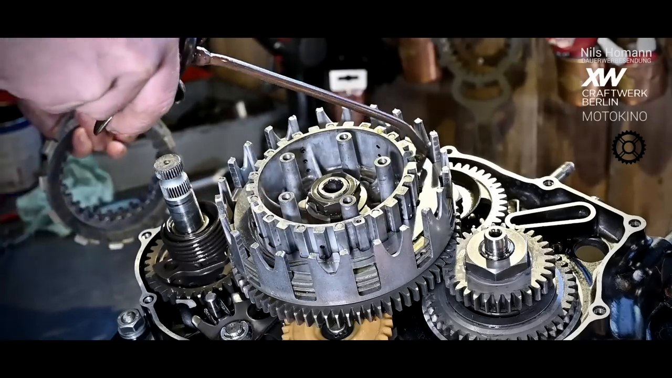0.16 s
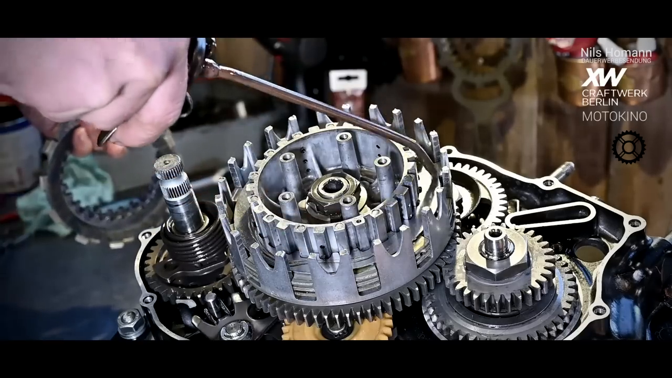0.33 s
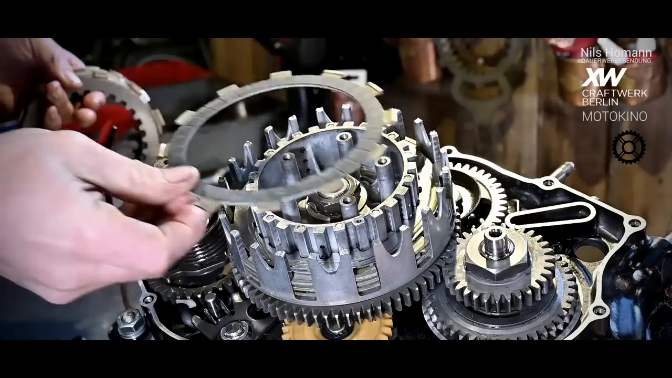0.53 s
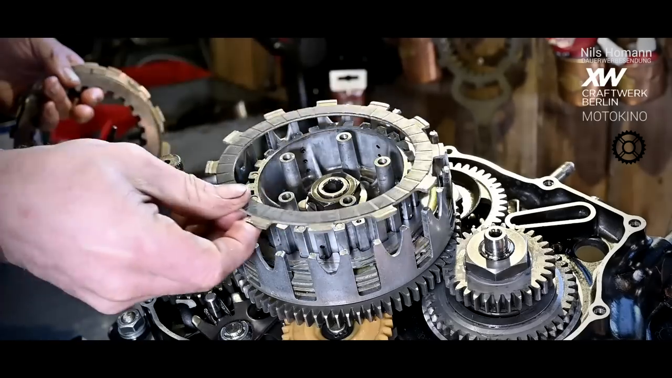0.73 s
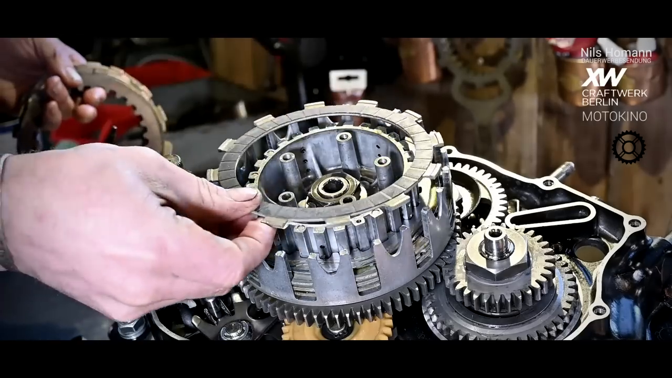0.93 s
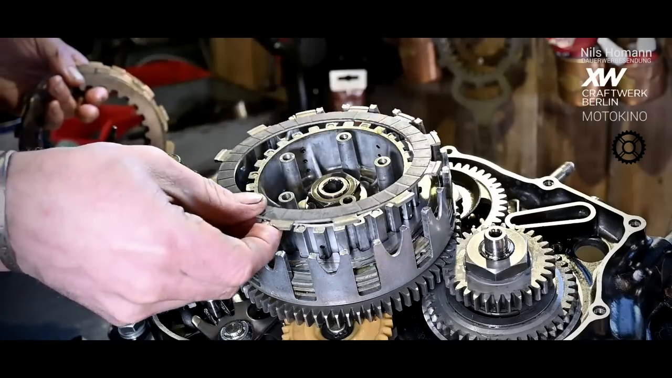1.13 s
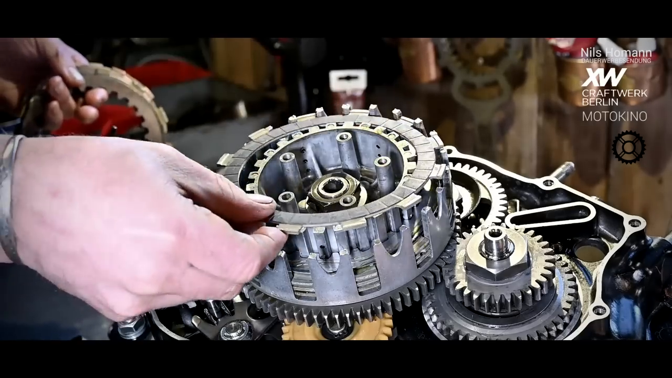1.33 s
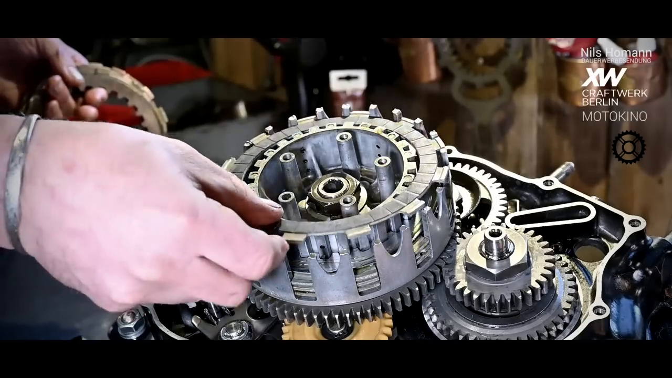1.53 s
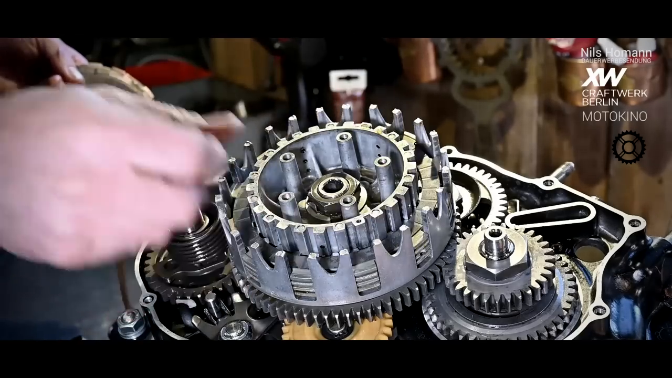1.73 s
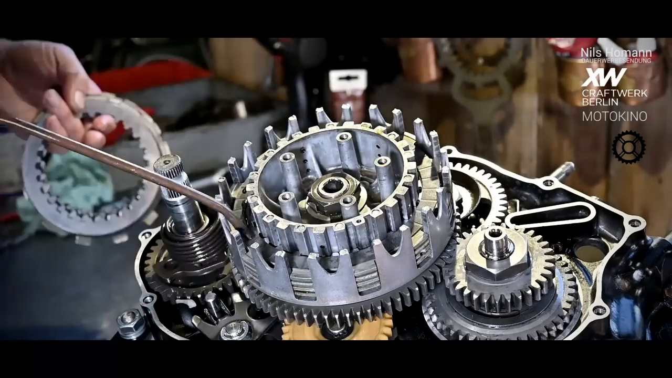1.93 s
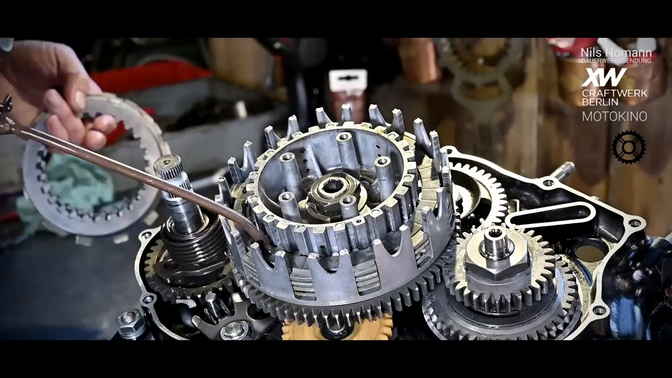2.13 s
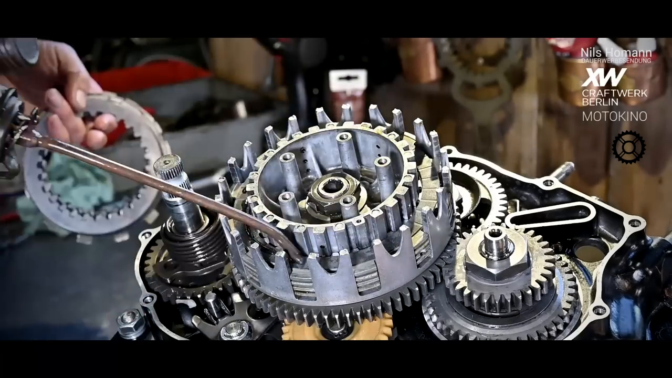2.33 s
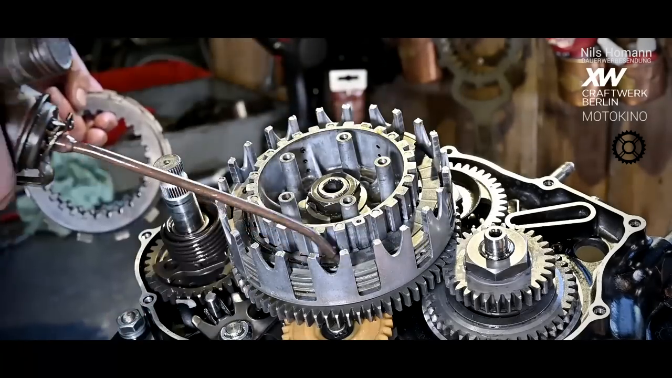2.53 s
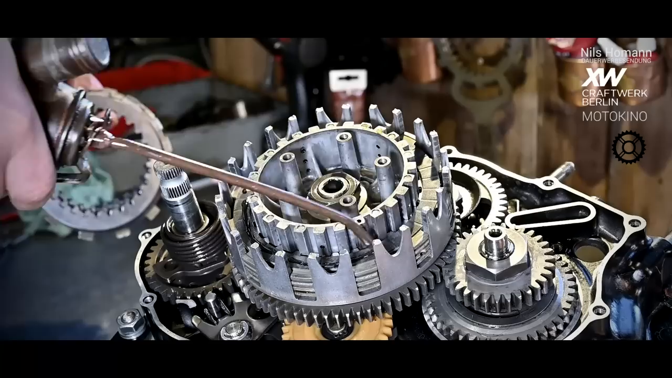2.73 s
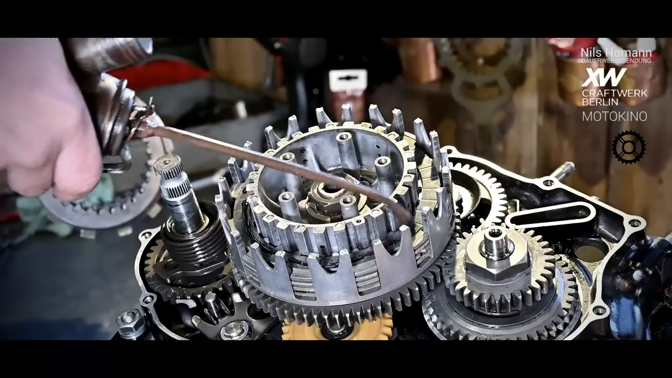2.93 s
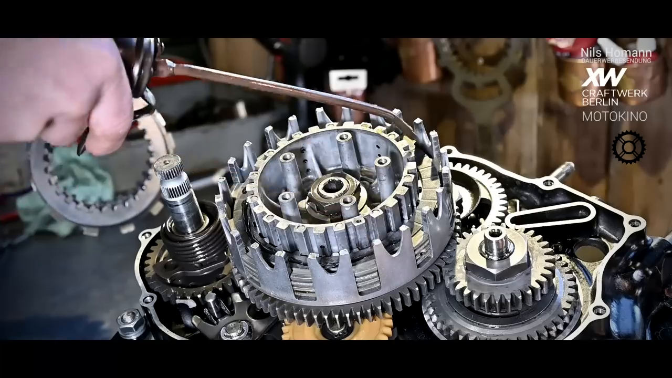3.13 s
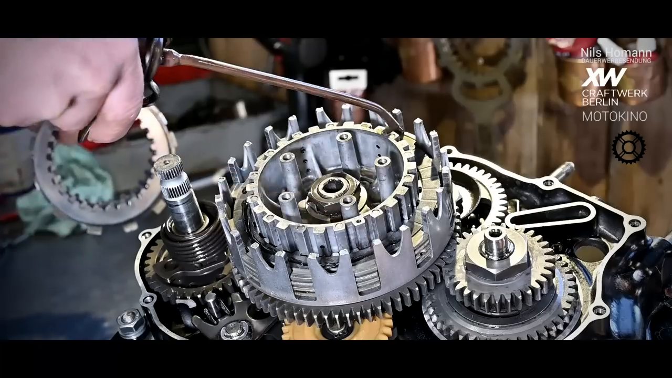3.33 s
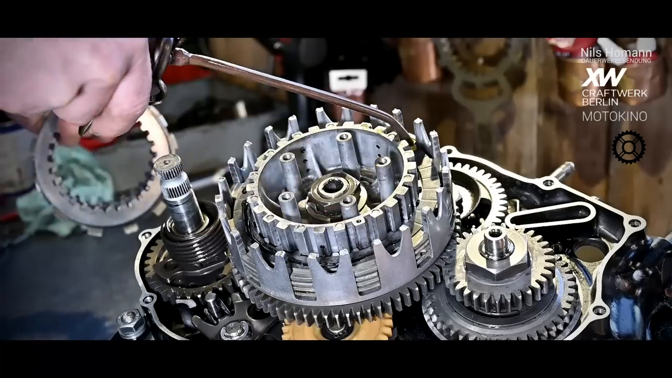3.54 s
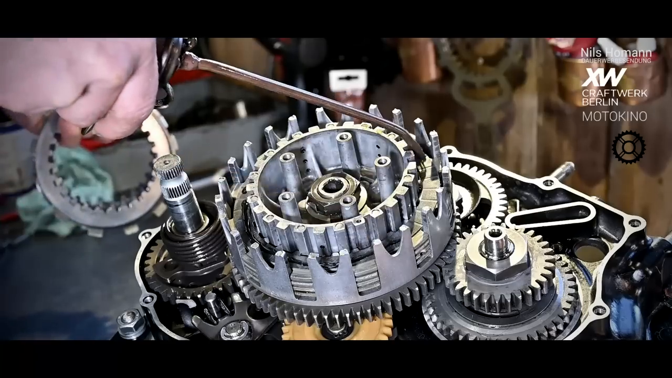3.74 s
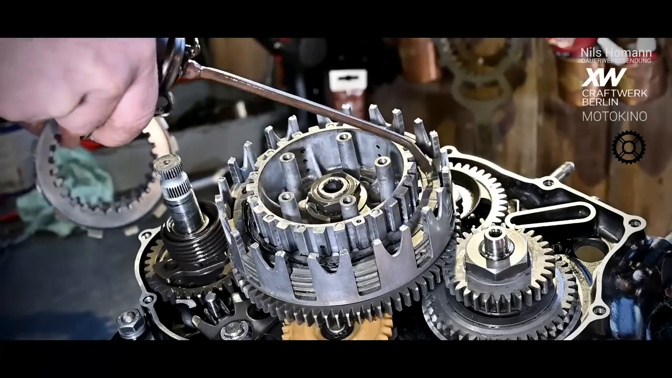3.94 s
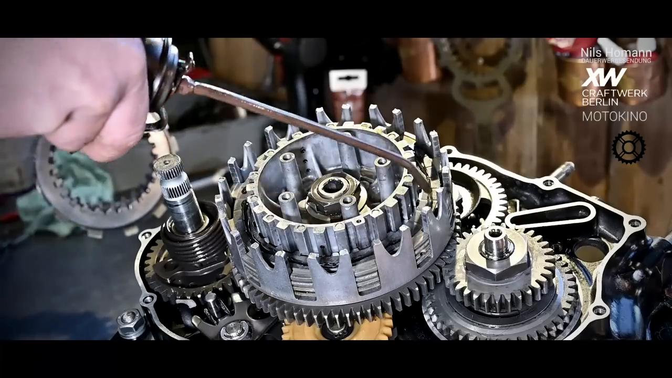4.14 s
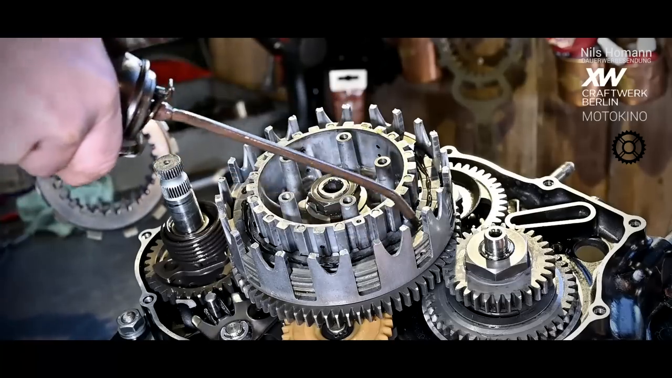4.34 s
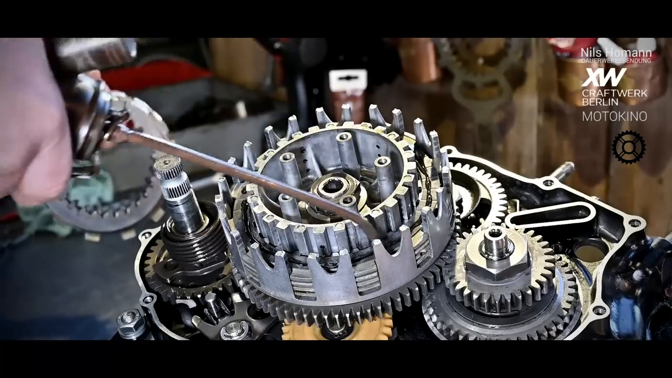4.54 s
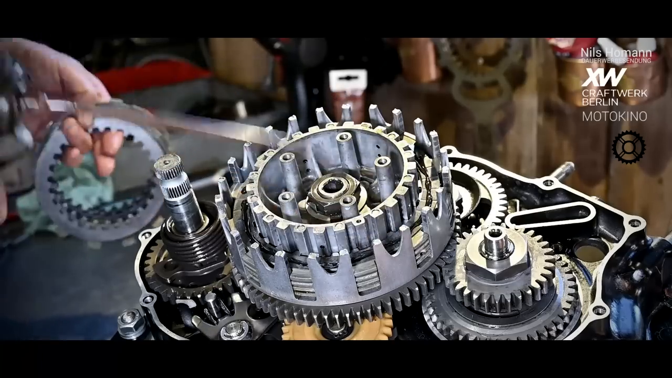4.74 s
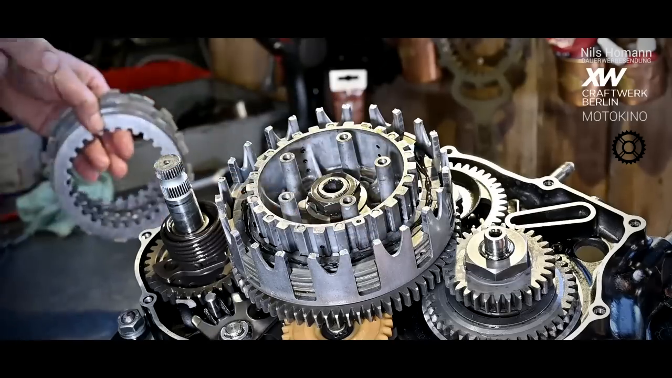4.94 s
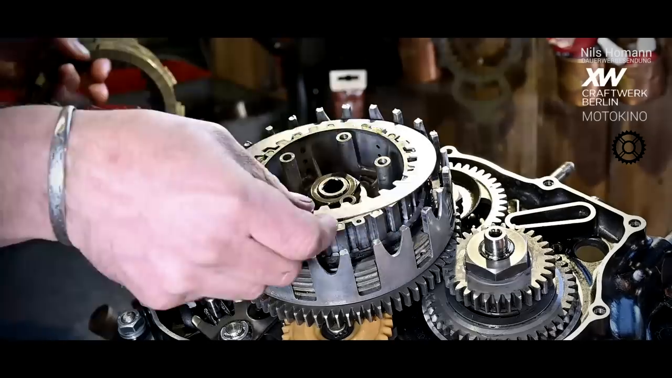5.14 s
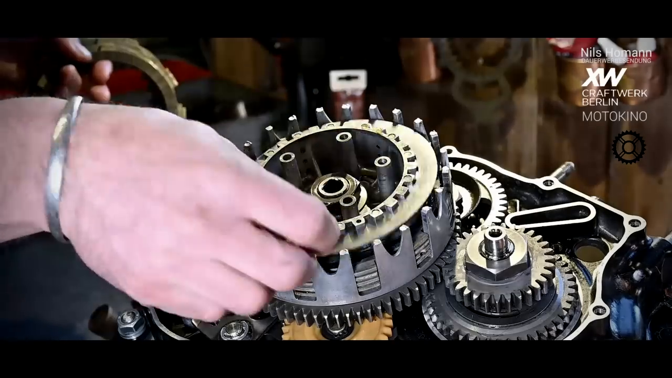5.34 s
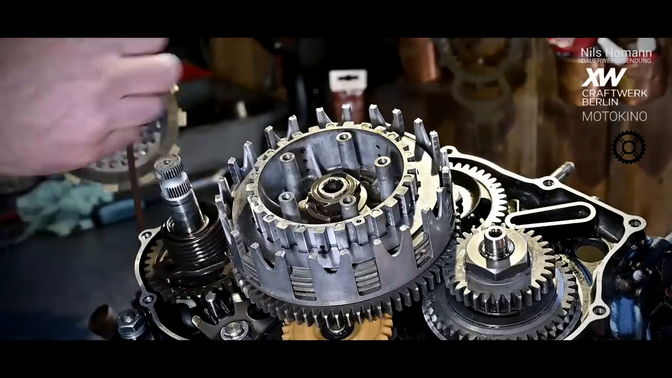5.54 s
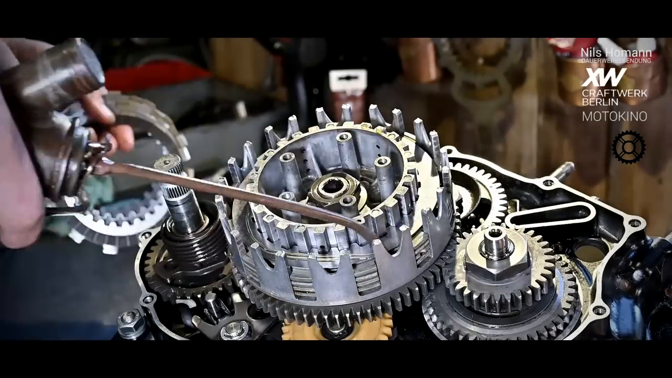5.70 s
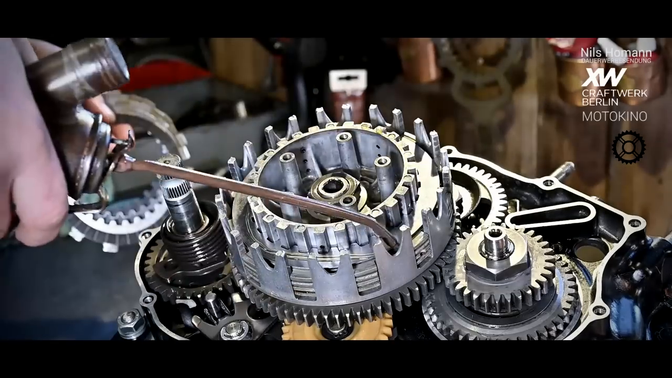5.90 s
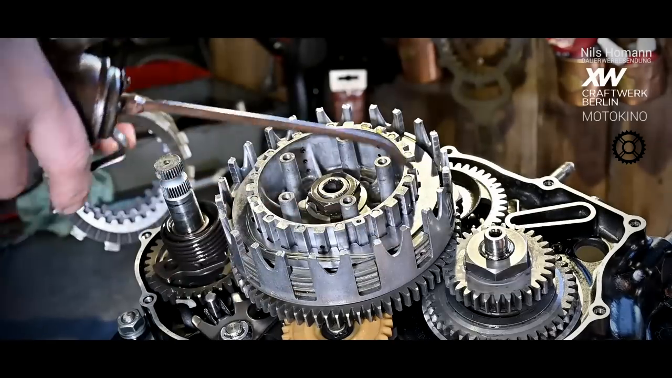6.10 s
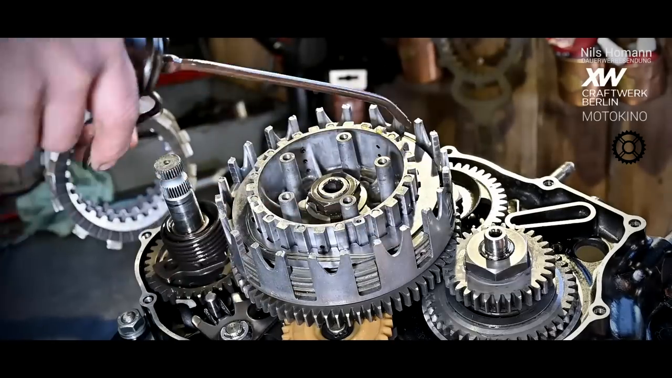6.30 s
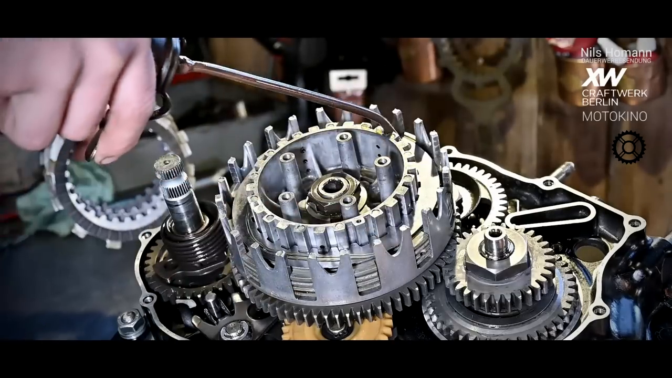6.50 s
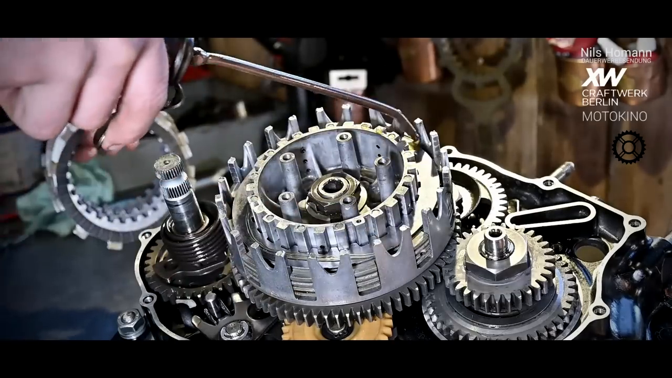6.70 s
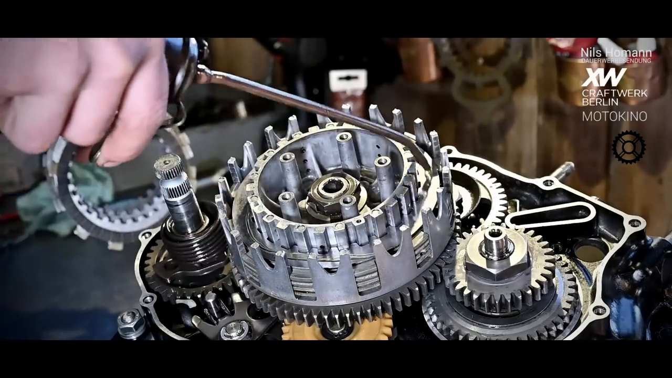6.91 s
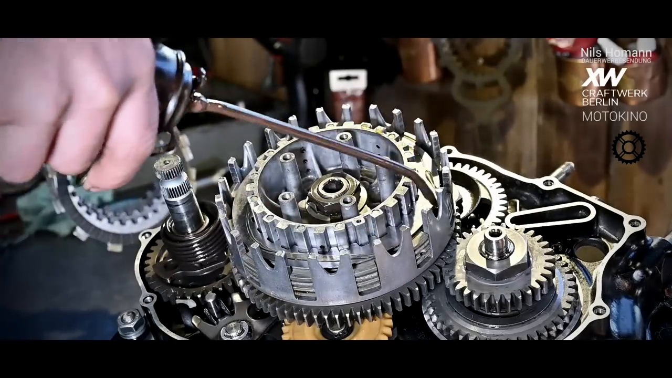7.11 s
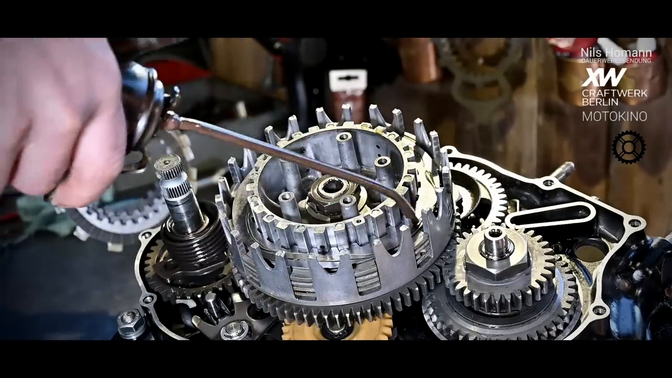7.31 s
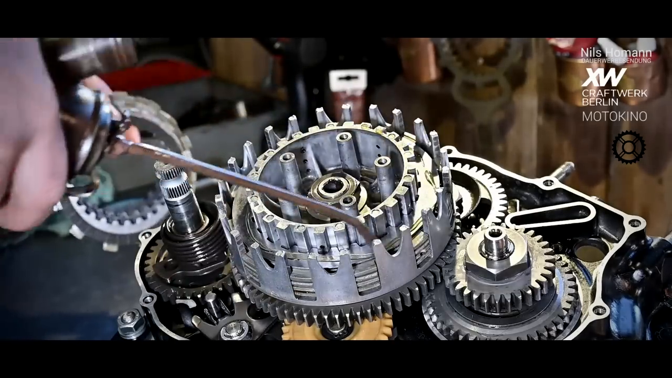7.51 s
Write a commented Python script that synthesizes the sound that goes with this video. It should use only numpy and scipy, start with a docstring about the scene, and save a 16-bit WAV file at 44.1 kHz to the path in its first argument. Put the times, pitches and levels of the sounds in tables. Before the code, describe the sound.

Close stereo sound of clutch assembly on a bench: small oiler clicks, dry plate knocks and a scrape, then a burst of hard lever clacks. Scattered clicks and faint squeaky lever slides continue. Soft steel ticks and pings lead to a quick, bright rattling ring as a steel plate settles. More oiling clicks and spout taps end quietly, with light rustling and low hiss in a short workshop reverberation.

```python
"""A small dry workshop, two spaced microphones: clutch plates are laid into their basket on a bench
and oiled between layers with a pump can. Blows are struck damped modes plus a noise snap: lever clicks,
spout taps, a lined plate knocking on the teeth, steel ticks. Noise rubbed through modes gives scrapes, rasp
and rustling hands; wavering lines ring a chattering steel plate. Pings, thumps and faint hums are single
tones; echoes, a noise-tap tail and steady hiss lie behind."""
import sys
import numpy as np
from scipy import signal
from scipy.fft import rfft, irfft
from scipy.io import wavfile
from scipy.ndimage import uniform_filter1d

SR = 44100
rng = np.random.default_rng(int(sys.argv[2]) if len(sys.argv) > 2 else 0)


def natural_amplitude(level_db):
    """Convert a level in decibels to a linear amplitude factor, elementwise."""
    exponent = np.asarray(level_db, float) / 20
    return 10 ** exponent


def generate_wav(signal):
    """Clip the signal to [-1, 1] and save it as 16-bit WAV at the path in sys.argv[1]."""
    frames = np.transpose(np.atleast_2d(signal))
    scaled = np.clip(frames, -1, 1) * 32767
    pcm = np.round(scaled).astype(np.int16)
    wavfile.write(sys.argv[1], SR, pcm)


N = 337806  # samples

# modes of the lined plate laid on the teeth: (frequency [Hz], width [Hz], level [dB])
LINED_MODES = [(1200, 490, -2.5), (2240, 530, 10.5), (3060, 300, 8.5), (4430, 330, -0.5), (5320, 250, 0.5),
               (6680, 360, 3), (7420, 270, 6.5), (10100, 210, -4), (13000, 400, 6), (14600, 1500, 14)]
# chatter of the free steel plate, duller at its end: (time [s], level [dB], brightness [dB])
STEEL_CHATTER = [(5.375, -62, -3), (5.392, -44, -5), (5.411, -36, 8), (5.415, -28, -6), (5.432, -24, -6),
                 (5.447, -31, 4.5), (5.456, -43, 7), (5.486, -38.5, -10), (5.524, -56, -10),
                 (5.572, -73, -10)]


def evened(x):
    """Scales to rms 1."""
    return x / np.sqrt(np.mean(x ** 2) + 1e-20)


def read(points, hz):
    """Reads a table on a log-frequency axis."""
    f, value = np.transpose(points)
    return np.interp(np.log(hz + 1), np.log(f + 1), value)


def add(mix, start_s, sound):
    """Mixes a two-channel sound in at start_s."""
    part = mix[:, round(start_s * SR):][:, :sound.shape[1]]
    part += sound[:, :part.shape[1]]


def slant(hz, centre_hz, thud_db, crack_db):
    """Gain in dB: 0 at the centre, thud_db at 700 Hz, crack_db at 10 kHz, up to 1.5 times those beyond."""
    below = np.clip(np.log(centre_hz / hz) / np.log(centre_hz / 700), 0, 1.5)
    above = np.clip(np.log(hz / centre_hz) / np.log(10000 / centre_hz), 0, 1.5)
    return below * thud_db + above * crack_db


def unroll(rows):
    """Start time and the columns of a curve, sample by sample."""
    s, *columns = np.transpose(rows)
    t = np.arange(s[0], s[-1], 1 / SR)
    return s[0], [np.interp(t, s, c) for c in columns]


def swells(table):
    """Level curve of each slide: swells to its level at 0.3 of its length, then fades."""
    return [[(s, db - 12.5), (s + 0.3 * length, db), (s + length, db - 22.5)] for s, length, db in table]


def pair(z, same):
    """Makes the second spectrum share part of the first."""
    same = np.clip(same, -1, 1)[:, None]
    return np.array([z[0], same * z[0] + np.sqrt(1 - same ** 2) * z[1]])


def causal(gain):
    """Spectrum of a gain curve in minimum phase: nothing sounds before the blow."""
    cepstrum = irfft(np.log(gain + 1e-5))
    half = len(cepstrum) // 2
    cepstrum[1:half] *= 2
    cepstrum[half + 1:] = 0
    return np.exp(rfft(cepstrum))


def add_tone(mix, start_s, hz, width_hz, level):
    """One tone, alike in both channels; its phase wanders as far as its width, its rms follows level."""
    wander = np.sqrt(2 * np.pi * width_hz / SR) * rng.standard_normal(len(level))
    phase = np.cumsum(2 * np.pi * hz / SR + wander)
    add(mix, start_s, np.tile(np.sqrt(2) * level * np.sin(phase), (2, 1)))


def blows(events, modes, feel, spread_db, extra_db, snap_db, top_hz, skew):
    """Each contact ticks, snaps and rings the modes, plus nine weak ones at random pitches that thicken it."""
    mix, t = np.zeros((2, N)), np.arange(4096) / SR
    bins = np.fft.rfftfreq(len(t), 1 / SR) + 1
    usual_crack_db, crack_per_db, soft_db = feel
    usual_blow_db = -28
    for s, level_db, centre_hz, contact_ms, thud_db in events:
        extra = [(hz, 220, extra_db) for hz in np.exp(rng.uniform(np.log(900), np.log(9000), size=9))]
        hz, width_hz, mode_db = (c[:, None] for c in np.transpose(modes + extra))
        weight, start, apart = rng.standard_normal((3, len(hz), 1))

        rise = 1 - np.exp(-hz * t / (1 + contact_ms))  # a long contact feeds the modes gradually
        fade = natural_amplitude(mode_db + spread_db * weight) * np.exp(-np.pi * width_hz * t) * rise
        phase = 2 * np.pi * hz * t + np.pi * np.arange(len(hz))[:, None] + 0.45 * start
        apart_rad = skew * apart * 2.7 * np.minimum(hz / 9000, 1)  # spaced microphones disagree more up high
        ring = np.array([(fade * np.sin(phase + side * apart_rad)).sum(0) for side in (-0.5, 0.5)])

        noise = rng.standard_normal((3, len(t)))  # shared, left, right
        noise[0, 0] = 4.07 / contact_ms  # the shorter the contact, the sharper its first tick
        snap = natural_amplitude(snap_db) * (noise[0] + skew * noise[1:]) * np.exp(-1000 * t / contact_ms)
        snap *= 1 - np.exp(-(1000 * t + 0.019) / (0.046 * contact_ms ** 2))  # a soft contact presses in

        # hard and short is bright
        crack_db = usual_crack_db + crack_per_db * (level_db - usual_blow_db) - soft_db * np.log2(contact_ms)
        spot_db = 4.5 * np.exp(-(np.log(bins / centre_hz) / 0.084) ** 2)  # the struck spot favours its own mode
        gain = natural_amplitude(slant(bins, centre_hz, thud_db, crack_db) + spot_db)
        gain *= bins / (bins + 400) / (1 + (bins / top_hz) ** 6)
        sound = irfft(rfft(ring + snap) * causal(gain))
        height = 3 * np.sqrt(np.mean(sound[:, :SR // 160] ** 2))  # 3 x rms of the first 6 ms
        add(mix, s, sound * natural_amplitude(level_db) / height)
    return mix


def rub(tables, modes, grain_db, same, colour_db=None):
    """Friction: grainy noise feeds every mode; level and colour follow the stroke's curve."""
    mix = np.zeros((2, N))
    for rows in tables:
        s, (level_db, *own_db) = unroll(rows)
        thud_db, crack_db = own_db or colour_db
        grain = natural_amplitude(grain_db * evened(uniform_filter1d(rng.standard_normal(len(level_db)), size=90)))
        noise = rng.standard_normal((3, len(grain)))  # shared, left, right
        drive = evened(grain * (same * noise[0] + (1 - same) * noise[1:]))
        sound = 0
        for hz, width_hz, mode_db in modes:
            r = np.exp(-np.pi * width_hz / SR)
            resonator = [1, -2 * r * np.cos(2 * np.pi * hz / SR), r * r]
            rung = signal.lfilter([1, 0, -1], resonator, drive)
            sound = sound + evened(rung) * natural_amplitude(mode_db + slant(hz, 1030, thud_db, crack_db))
        add(mix, s, sound * natural_amplitude(level_db) * signal.windows.tukey(len(grain), 0.15))
    return mix


def hiss():
    """Steady air of the workshop and the microphones' own noise: shaped, partly shared noise."""
    # spectrum shape: (frequency [Hz], density [dB])
    shape = [(12, -22), (20, -0.5), (174, 1), (342, -3), (670, -3), (816, -3.5), (1280, -5), (12500, -19),
             (15200, -11.5), (16500, -23)]
    # left-right likeness: (frequency [Hz], share [0-1])
    likeness = [(60, 0.3), (300, 0.089), (1000, 0.03)]
    rms_db = -59.5
    hz, _, z = signal.stft(rng.standard_normal((2, N + 4096)), SR, nperseg=2048)
    z = pair(z, read(likeness, hz)) * natural_amplitude(read(shape, hz))[:, None]
    return natural_amplitude(rms_db) * evened(signal.istft(z, SR, nperseg=2048)[1][:, :N])


def room_tail(x, gap_s=0.0019):
    """Sparse taps of random sign, one in every 20 samples, each band dying at its own speed."""
    # decay: (frequency [Hz], t60 [s])
    decay = [(500, 0.23), (1500, 0.19), (2600, 0.25), (8000, 0.23), (15000, 0.19)]
    # left-right likeness: (frequency [Hz], share [0-1])
    likeness = [(500, 0.94), (1400, 1), (3000, 0.1), (7000, 0.011)]
    size = SR // 2
    taps = np.zeros((2, size))
    at = np.arange(0, size - 20, 20) + rng.integers(0, 20, (2, (size - 1) // 20))
    np.put_along_axis(taps, at, rng.choice([-1., 1.], at.shape), 1)
    taps *= np.clip(np.arange(size) / SR / gap_s - 0.5, 0, 1)  # the first walls answer after a short gap
    hz, t, z = signal.stft(taps, SR, nperseg=256)
    z = pair(z, read(likeness, hz)) * natural_amplitude(-60 * t / read(decay, hz)[:, None])
    tail = signal.istft(z, SR, nperseg=256)[1]
    return signal.oaconvolve(x.mean(0)[None], tail / np.linalg.norm(tail[0]), axes=1)[:, :N]


def workshop_echo(wet):
    """Tail of the workshop plus early echoes that cross to the other channel."""
    # bench and nearest walls: (delay [s], level [dB])
    early = [(.0045, -16), (0.015, -23)]
    # the answer turns steadily between two random tails, so no one pattern stands out
    turn = np.pi * 2.3 * np.arange(N) / SR
    echo = room_tail(wet * np.sin(turn)) + room_tail(wet * np.cos(turn))
    for delay_s, echo_db in early:
        add(echo, delay_s, natural_amplitude(echo_db) * wet[::-1, :N - round(delay_s * SR)])
    return echo


def low_hums():
    """Faint low hums come and go: tones blurred by phase wander."""
    # hums: (time [s], length [s], level [dB], frequency [Hz], width [Hz])
    hums = [(3, 1.44, -70, 177.7, 21), (4.949, 1, -72, 99.9, 40.4)]
    mix = np.zeros((2, N))
    for s, length_s, db, hz, width_hz in hums:
        t = np.arange(0, length_s, 1 / SR)
        add_tone(mix, s, hz, width_hz, natural_amplitude(db) * signal.windows.tukey(len(t), 0.5))
    return mix


def hands_rustle():
    """Hands and sleeves: each movement swells to its height and fades; a dull one is also heavier below."""
    # movements: (time [s], length [s], level [dB], crack [dB], height reached at share of length [0-1])
    movements = [(0.5, 0.13, -62, -7, 0.47), (0.546, 0.3, -62, -56, 0.08), (1.3, 0.53, -65, 4, 0.77),
                 (1.702, 0.36, -60.5, -2.5, 0.68), (4.45, 0.31, -64, -29, 0.17),
                 (4.7, 0.47, -66.5, -2.5, 0.42), (5.051, .67, -62, -18, 0.16), (7.309, 0.18, -65, -11, 0.2),
                 (7.448, 0.27, -64, -0.5, 0.45)]
    edge_drop_db, usual_thud_db, dull_to_thud = 8, -0.5, 0.074
    curves = []
    for s, length_s, db, crack_db, top in movements:
        thud_db = usual_thud_db - dull_to_thud * crack_db
        top_s = s + np.clip(top, 0.03, 0.97) * length_s
        curves.append([(s, db - edge_drop_db, thud_db, crack_db),
                       (top_s, db, thud_db, crack_db),
                       (s + length_s, db - edge_drop_db, thud_db, crack_db)])
    cloth = [(hz, 1.2 * hz, -6) for hz in np.geomspace(330, 13000, 8)]  # broad, overlapping: no pitch
    return rub(curves, cloth, grain_db=3.0, same=0.38)


def knuckle_thumps():
    """Knuckles thump the housing: a few cycles of one tone under a half-sine."""
    # thumps: (time [s], level [dB], frequency [Hz])
    thumps = [(5.199, -55, 417), (5.237, -48, 386)]
    cycles = 2.7
    mix = np.zeros((2, N))
    for s, db, hz in thumps:
        t = np.arange(0, cycles / hz, 1 / SR)
        add_tone(mix, s, hz, 0, natural_amplitude(db) * np.sin(np.pi * t * hz / cycles))
    return mix


def plate_pings():
    """Held plates ping, sagging slowly until the fingers damp them."""
    # pings: (time [s], length [s], level [dB], frequency [Hz])
    pings = [(4.503, 0.056, -60, 1172), (4.58, 0.12, -54.5, 1168), (4.733, 0.045, -44, 1177),
             (7.399, 0.17, -65, 3330), (7.588, 0.071, -64, 3340)]
    rise_s, damp_s, sag_db, width_share = 0.0045, 0.025, 4, 0.0061  # width as a share of pitch
    mix = np.zeros((2, N))
    for s, length_s, db, hz in pings:
        t = np.arange(0, length_s, 1 / SR)
        ends = np.clip(np.minimum(t / rise_s, (length_s - t) / damp_s), 0, 1)
        add_tone(mix, s, hz, width_share * hz, natural_amplitude(db - sag_db * t / length_s) * ends)
    return mix


def oil_can():
    """Pump can: lever clicks and spout taps strike its modes, the sliding lever rubs them."""
    # crack: (usual [dB], gained per dB of force [dB], lost per doubled contact [dB])
    can_feel = (-5, 0.78, 7)
    # lever clicks: (time [s], level [dB], centre [Hz], contact [ms], thud [dB])
    clicks = [(0.32, -26.5, 1660, 1.1, -0.5), (0.37, -38.5, 2170, 1.9, -2), (0.469, -36, 1740, 5, 0.5),
              (2.815, -21, 2800, 0.86, -2), (2.853, -31.5, 2830, 1.8, 0), (2.883, -12.5, 4020, 0.64, -7.5),
              (2.981, -14, 3560, 0.67, -5.5), (3.49, -26.5, 1600, 0.61, -3.5),
              (3.678, -27, 4470, 0.78, 0.5), (3.835, -24.5, 1440, 0.74, 0), (3.92, -39, 1540, 1.4, -16),
              (4.035, -27, 1480, 0.57, 0), (4.214, -38.5, 2500, 4.1, -13), (4.286, -37, 2530, 0.86, -3),
              (5.827, -28, 820, 6.9, -5), (5.859, -32, 850, 3.3, 3), (6.003, -39.5, 1890, 0.43, 7.5),
              (6.05, -14, 2430, 0.75, 2), (6.065, -23, 3040, 3.1, -20)]
    # spout touching the plates: (time [s], level [dB], centre [Hz], contact [ms], thud [dB])
    taps = [(2.637, -27.5, 2000, 0.98, -5), (2.729, -41, 2300, 2.4, -4), (6.544, -26, 4130, 1.8, -8),
            (6.578, -33, 1800, 3.4, -4), (6.713, -42, 2420, 7.5, -1.5), (6.942, -25.5, 2300, 1.15, -1)]
    # can modes: (frequency [Hz], width [Hz], level [dB])
    can_modes = [(561, 49, -11), (840, 280, -0.5), (1580, 174, 7.5), (1980, 390, 6.5), (2500, 340, 9),
                 (3077, 240, 6), (3700, 196, 1), (4083, 150, 2.5), (4475, 93, -1), (4746, 102, -2),
                 (5280, 130, -2), (5750, 360, -12), (6750, 150, -6.5), (8040, 330, -11), (9800, 1200, -5)]
    # spout modes: (frequency [Hz], width [Hz], level [dB])
    spout_modes = [(1820, 156, 3), (2350, 230, 1.5), (2800, 190, 4), (3400, 230, 5.5), (4060, 210, 1),
                   (4620, 220, 4.5), (5470, 320, 4), (7750, 500, -5)]
    # lever sliding in the can: (time [s], length [s], level [dB])
    strokes = [(0, 0.088, -68.5), (3.571, 0.09, -62), (3.749, 0.061, -64.5), (3.916, 0.059, -60),
               (4.084, 0.066, -64), (5.74, 0.21, -60), (5.82, 0.058, -59.5), (5.995, 0.051, -58.5),
               (6.702, 0.032, -64)]
    struck = sum(blows(events, modes, can_feel, spread_db=2.5, extra_db=-10.5, snap_db=4.5, top_hz=9300, skew=1.0)
                 for events, modes in ((clicks, can_modes), (taps, spout_modes)))
    return struck + rub(swells(strokes), can_modes, grain_db=1.5, same=0.44, colour_db=(-6, -9))


def lined_plate():
    """Lined plate: taps while in the hand, then knocks on the teeth, each with its own modes."""
    # crack: (usual [dB], gained per dB of force [dB], lost per doubled contact [dB])
    lined_feel = (-12, 0.017, 7.7)
    # taps, plate still in the hand: (time [s], level [dB], centre [Hz], contact [ms], thud [dB])
    taps = [(0.897, -20.5, 6240, 0.48, -21), (0.919, -29.5, 3400, 1.1, -3), (1.132, -31, 5510, 1.4, -1),
            (1.1415, -20.5, 7700, 0.34, -9), (1.173, -29, 3380, 1.8, -8)]
    # knocks: (time [s], level [dB], centre [Hz], contact [ms], thud [dB])
    knocks = [(1.2015, -14.5, 3000, 2.2, -12), (1.37, -33.5, 2460, 0.53, 1),
              (1.409, -39.5, 1860, 1.2, -0.5), (1.627, -30.5, 1880, 6.2, -12),
              (1.676, -17.5, 3230, 3, -13.5), (1.706, -12.5, 4570, 0.39, -46),
              (6.373, -50, 8200, 0.26, -20)]
    # modes in the hand: (frequency [Hz], width [Hz], level [dB])
    held_modes = [(3150, 220, 3), (4020, 54, -8), (5600, 170, 8.5), (6070, 420, 7.5), (7700, 170, 6),
                  (10350, 280, 0), (14300, 1500, 15)]
    return sum(blows(events, modes, lined_feel, spread_db=4.0, extra_db=-12, snap_db=9.0, top_hz=17000, skew=0.78)
               for events, modes in ((taps, held_modes), (knocks, LINED_MODES)))


def plate_scrapes():
    """Fairly even scrapes of plates on the teeth; the last is the steel plate, through the lined plate's modes."""
    # scrapes: (time [s], length [s], level [dB])
    scrapes = [(1.13, 0.079, -53.5), (1.63, 0.038, -58), (1.68, 0.037, -42), (5.362, 0.05, -51.5)]
    return rub(swells(scrapes), LINED_MODES, grain_db=-0.5, same=0.75, colour_db=(-9, -12))


def steel_ticks():
    """A held steel plate ticks: blows with a strong snap."""
    # crack: (usual [dB], gained per dB of force [dB], lost per doubled contact [dB])
    steel_feel = (-6, 0.94, 1.2)
    # ticks: (time [s], level [dB], centre [Hz], contact [ms], thud [dB])
    ticks = [(4.579, -44, 1500, 9.1, -1), (4.643, -44.5, 1910, 10.3, 2), (4.734, -40.5, 1740, 4.1, -1),
             (5.2, -35.5, 3080, 3.5, 7), (5.211, -47, 2410, 3.5, -10), (5.312, -36.5, 2270, 8.1, -1.5),
             (5.364, -31, 3150, 3.3, 5), (5.391, -28.5, 1400, 4, 2.5), (5.444, -27, 7000, 2, -15),
             (7.318, -50.5, 2010, 11.6, -18), (7.384, -45.5, 2700, 12.5, -12),
             (7.539, -46, 3270, 13.2, -18), (7.588, -46, 3300, 13.3, -8)]
    # modes in the hand: (frequency [Hz], width [Hz], level [dB])
    held_modes = [(1400, 240, 26), (2360, 195, 21), (3150, 130, 16), (6540, 160, 14), (14200, 900, -2)]
    return blows(ticks, held_modes, steel_feel, spread_db=6.5, extra_db=-12, snap_db=25.5, top_hz=16300, skew=0.94)


def teeth_rasp():
    """Rasp of the teeth: friction through the lined plate's modes that follows the steel plate's chatter."""
    curve = [(s, db - 23.5, -6.0, bright_db - 20.0) for s, db, bright_db in STEEL_CHATTER]
    return rub([curve], LINED_MODES, grain_db=3, same=0.97)


def steel_ring(waver_db=1.96, skew=0.9, blur_hz=12):
    """The chattering steel plate keeps all its lines sounding; each wavers as teeth touch and let go."""
    # lines of the free plate: (frequency [Hz], level [dB])
    lines = [(1066, -50), (1642, -38), (2735, -28), (3951, -30.5), (5200, -40.5), (6503, -39.5),
             (7181, -59), (7838, -40), (9168, -40), (9738, -48), (10535, -40.5), (11876, -43),
             (13130, -41.5), (14212, -40), (14772, -38)]
    thud_db = -5.5
    s, (level_db, crack_db) = unroll(STEEL_CHATTER)
    t, sound, top_db = np.arange(len(level_db)) / SR, 0, max(db for _, db in lines)
    for hz, line_db in lines:
        slow_noise = evened(uniform_filter1d(rng.standard_normal(len(t)), size=500))
        waver = waver_db * np.log2(1 + hz / 2700) * slow_noise
        apart_rad = skew * min(hz / 4000, 1) * rng.choice([-1, 1])  # between the microphones
        wander = np.cumsum(np.sqrt(2 * np.pi * blur_hz / SR) * rng.standard_normal(len(t)))
        phase = 2 * np.pi * (rng.random() + hz * t) + uniform_filter1d(wander, size=60)
        phase = phase + np.array([[0], [apart_rad]])
        height = natural_amplitude(line_db - top_db + waver + slant(hz, 3600, thud_db, crack_db))
        sound = sound + height * np.sin(phase)
    mix = np.zeros((2, N))
    add(mix, s, sound * natural_amplitude(level_db) * signal.windows.tukey(len(t), 0.1))
    return mix


def scene():
    """Everything on the bench, its echo in the workshop, and the hiss."""
    hands, can, steel = hands_rustle(), oil_can(), steel_ticks()
    plates = lined_plate() + plate_scrapes()
    ring = steel_ring() + teeth_rasp()
    tones = plate_pings() + knuckle_thumps() + low_hums()
    wet = natural_amplitude(-1.5) * can + natural_amplitude(-2.0) * plates + natural_amplitude(-1.0) * steel + natural_amplitude(-8.0) * ring + natural_amplitude(-6.0) * hands
    mix = can + plates + steel + ring + hands + tones + workshop_echo(wet) + hiss()
    return natural_amplitude([[-0.3], [0.3]]) * mix  # left, right


def roll_off(x):
    """The treble ends steeply here."""
    return signal.sosfilt(signal.butter(12, 17000, fs=SR, output="sos"), x)


def record(dry):
    """The recorder's band limit: a linear-phase low-pass at 16.3 kHz."""
    edge = signal.firwin(255, 16300, window=("kaiser", 9), fs=SR)
    finished = signal.oaconvolve(dry, edge[None], "same")
    return roll_off(finished)


dry = scene()
out = record(dry)
generate_wav(out)
```